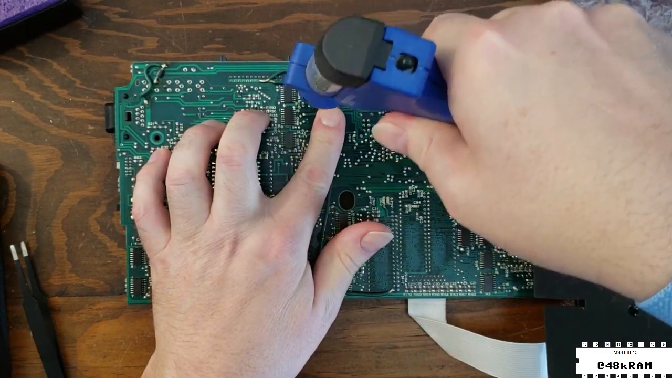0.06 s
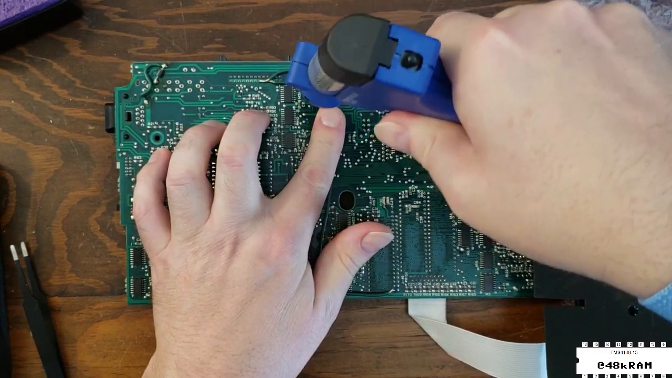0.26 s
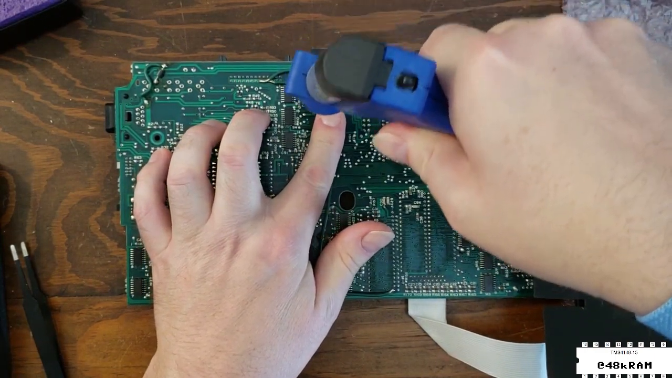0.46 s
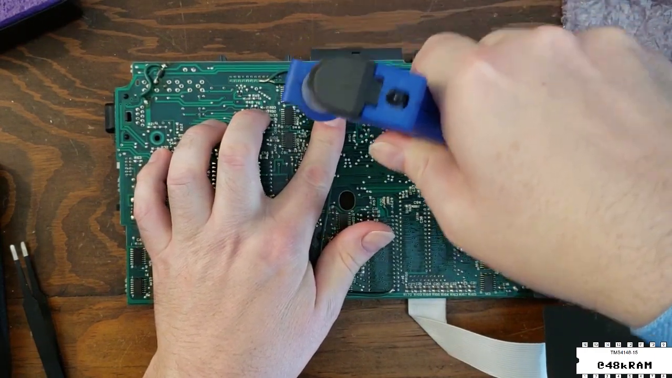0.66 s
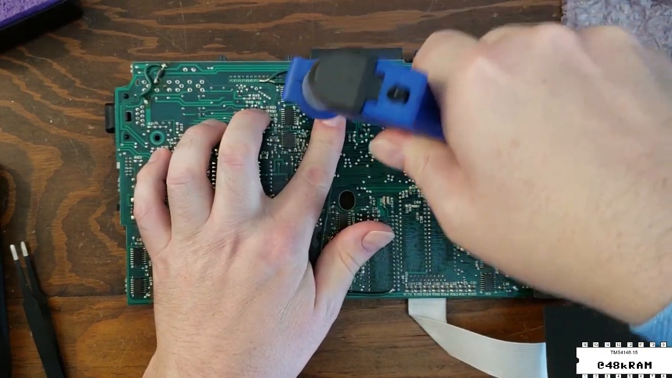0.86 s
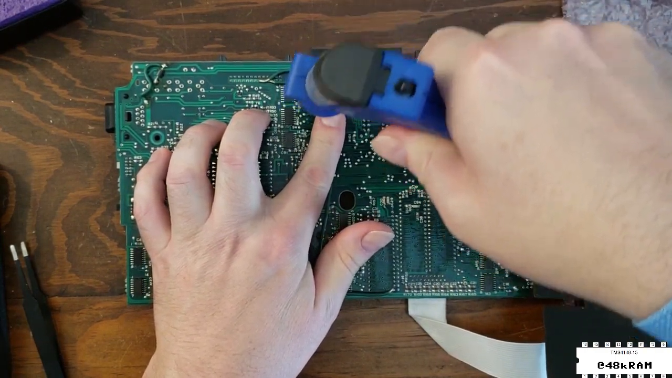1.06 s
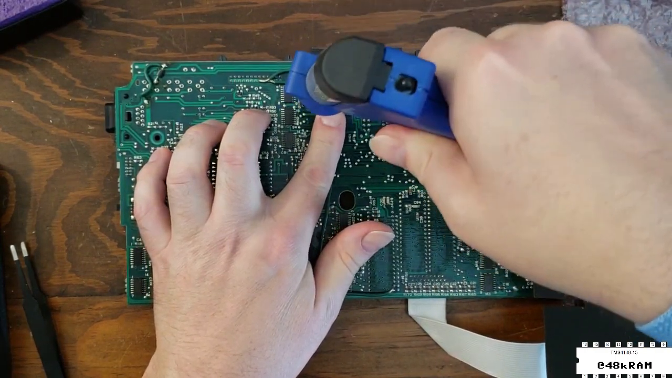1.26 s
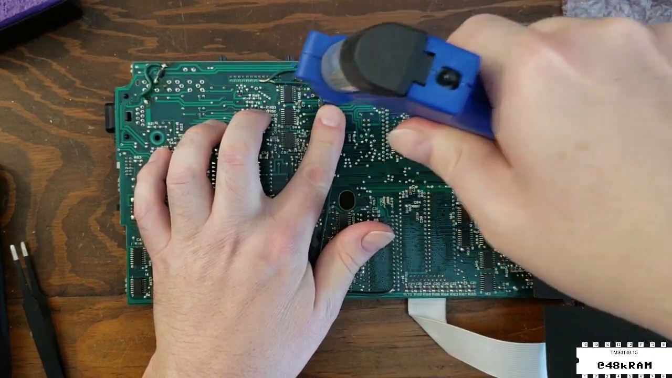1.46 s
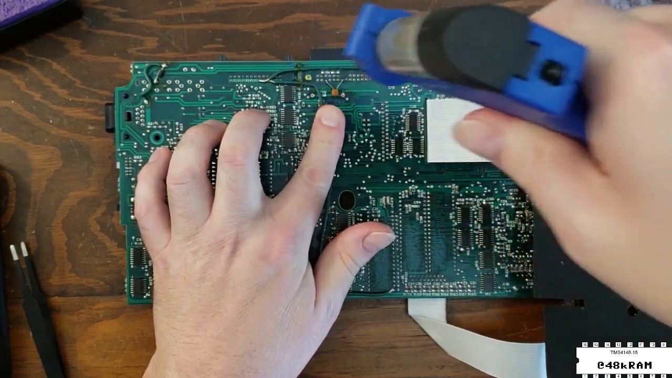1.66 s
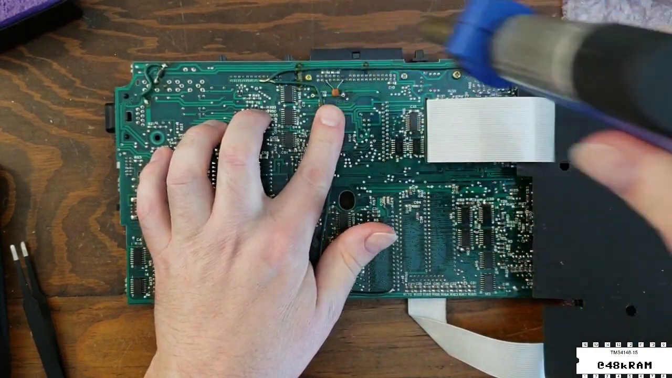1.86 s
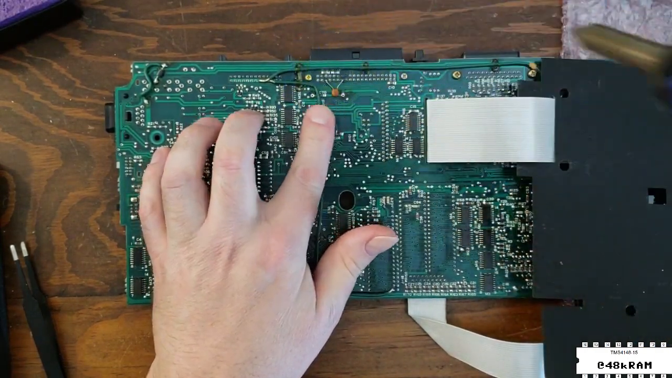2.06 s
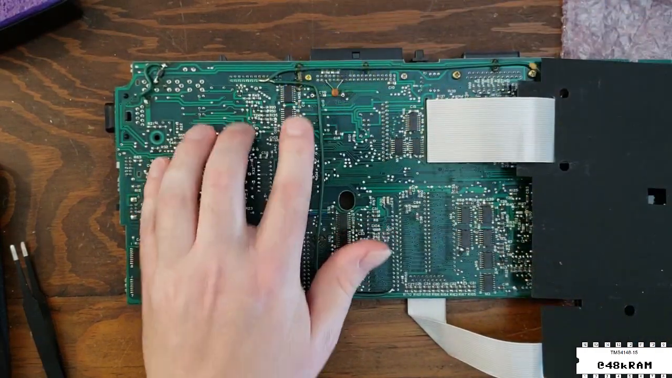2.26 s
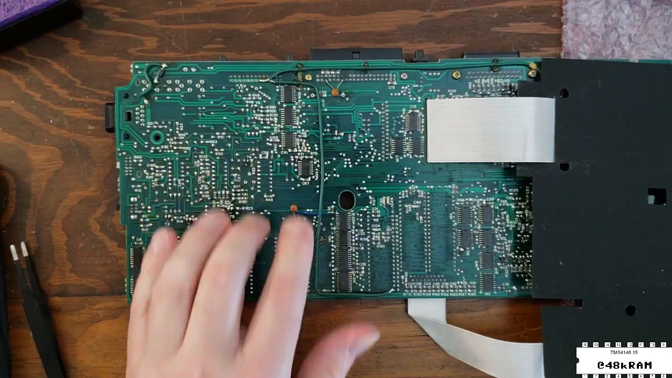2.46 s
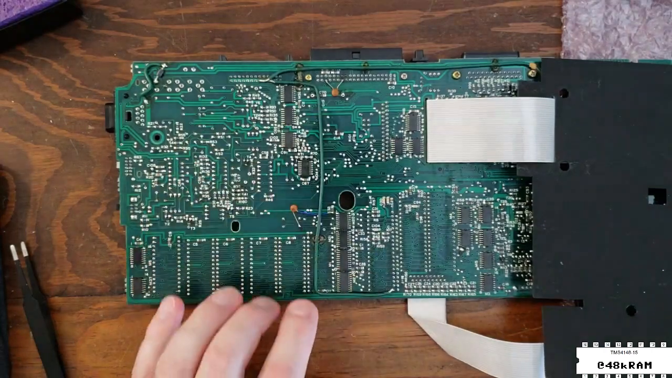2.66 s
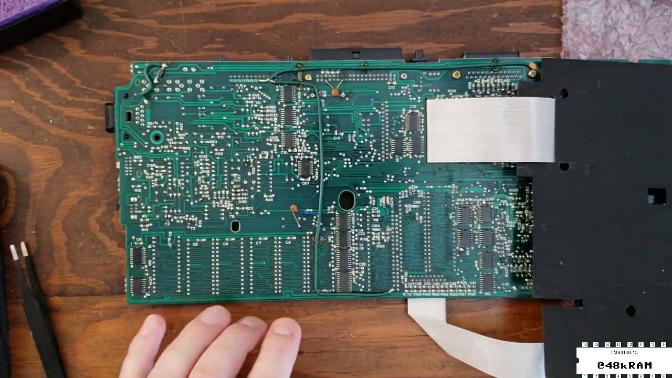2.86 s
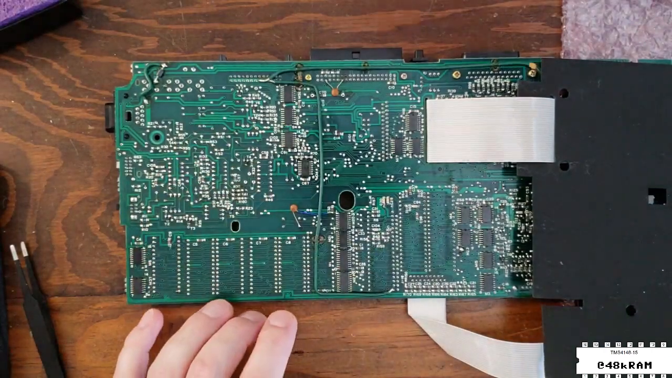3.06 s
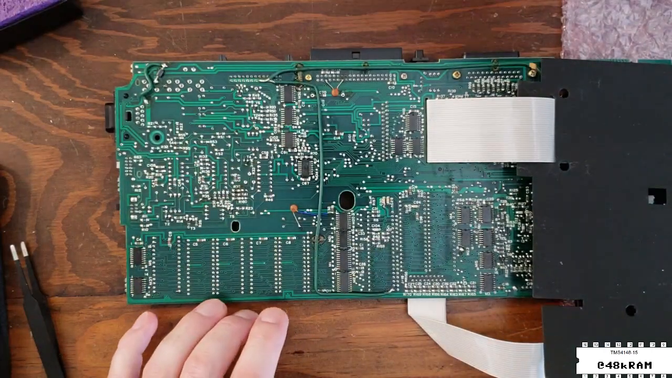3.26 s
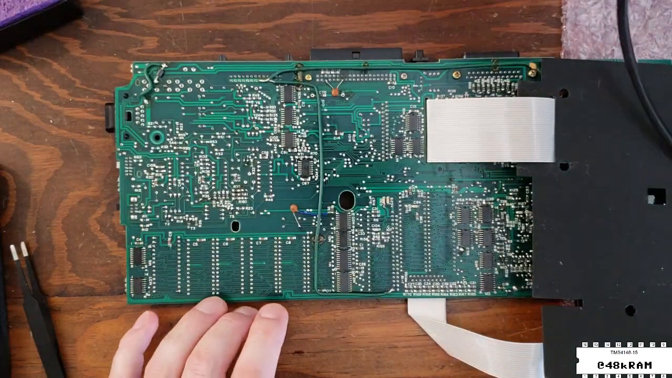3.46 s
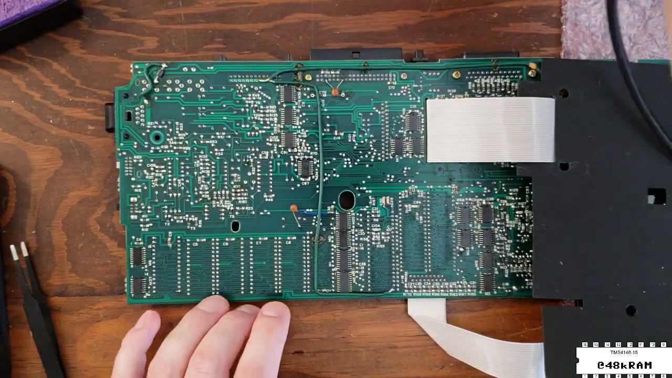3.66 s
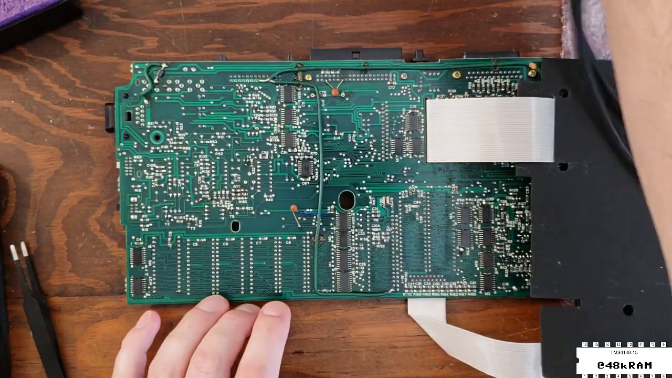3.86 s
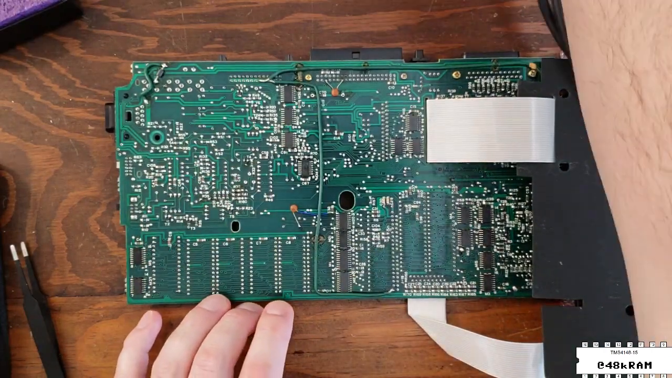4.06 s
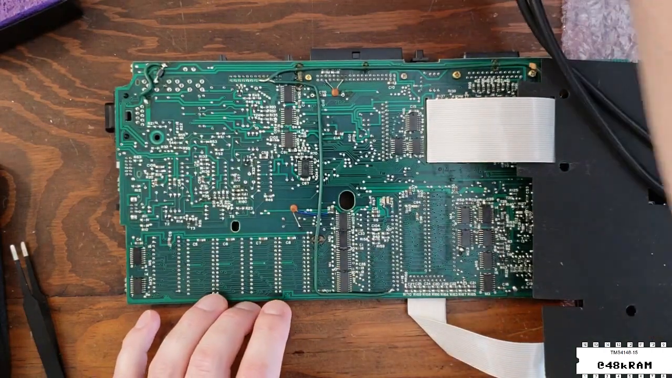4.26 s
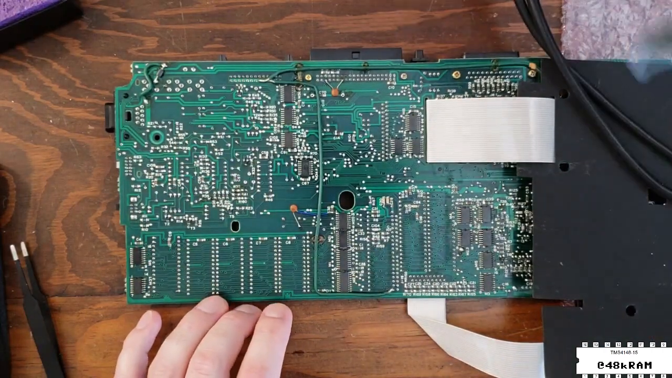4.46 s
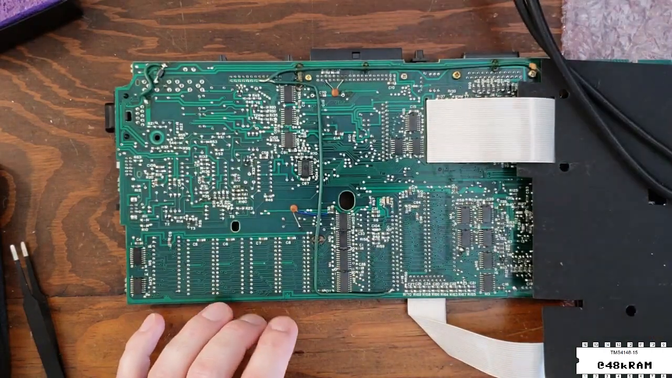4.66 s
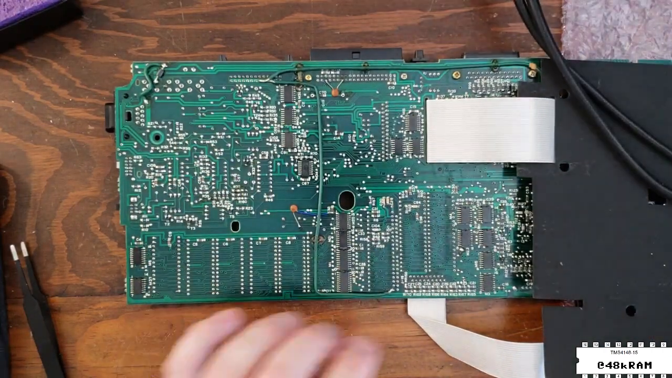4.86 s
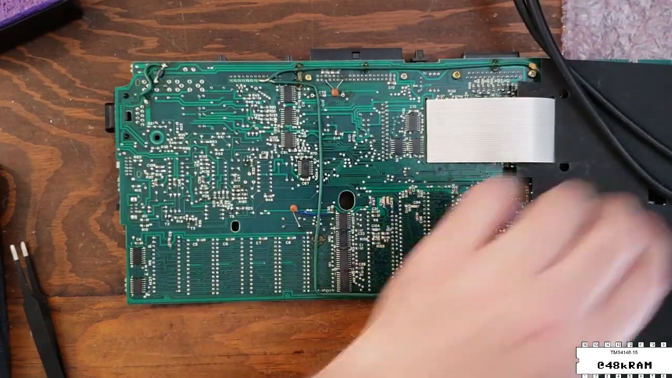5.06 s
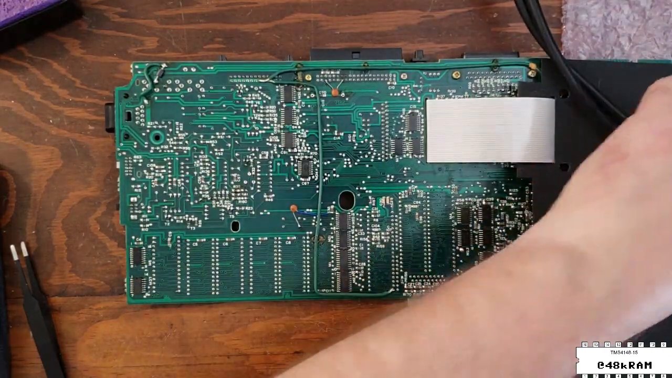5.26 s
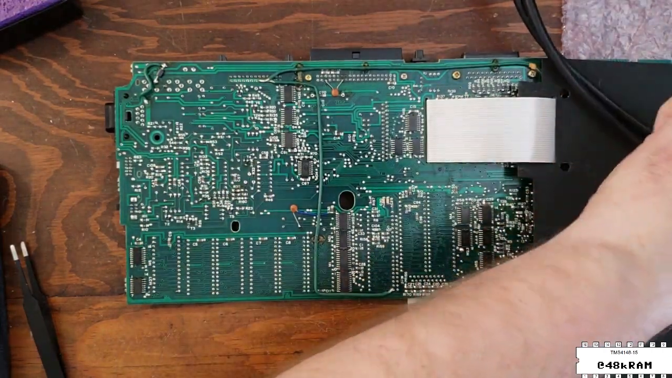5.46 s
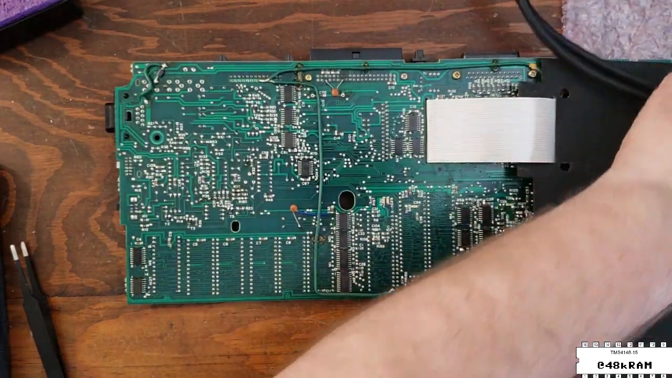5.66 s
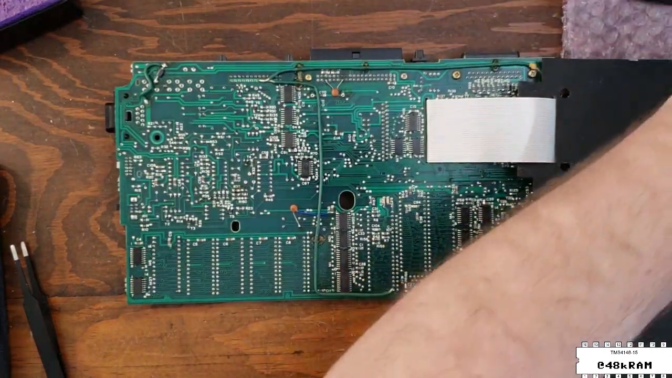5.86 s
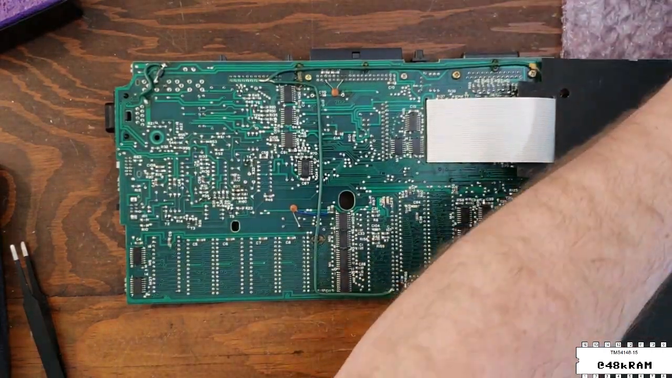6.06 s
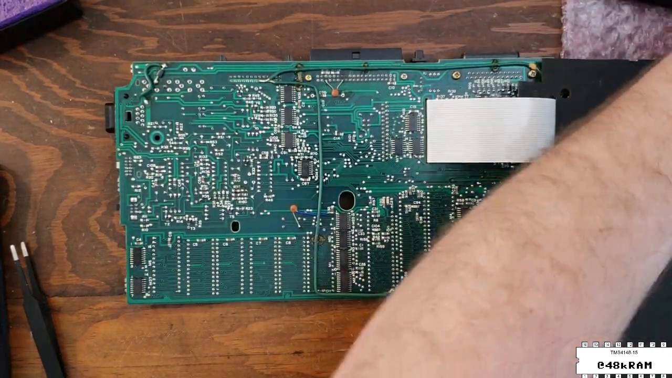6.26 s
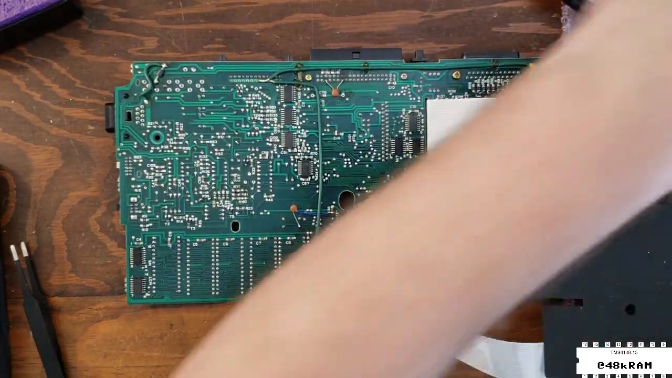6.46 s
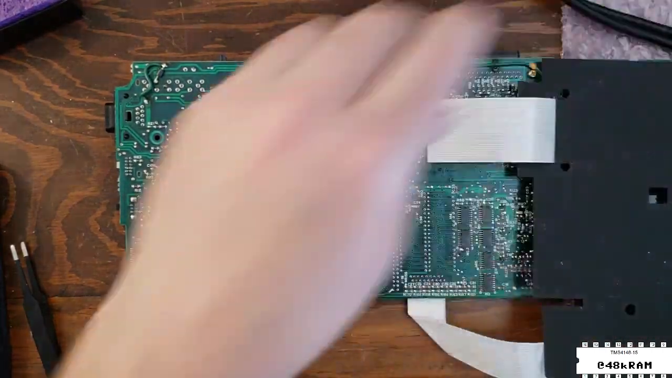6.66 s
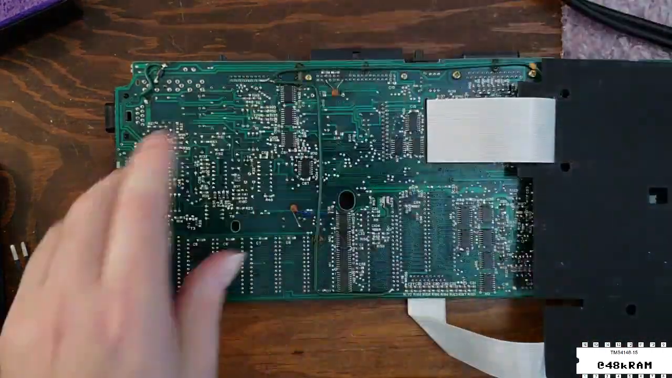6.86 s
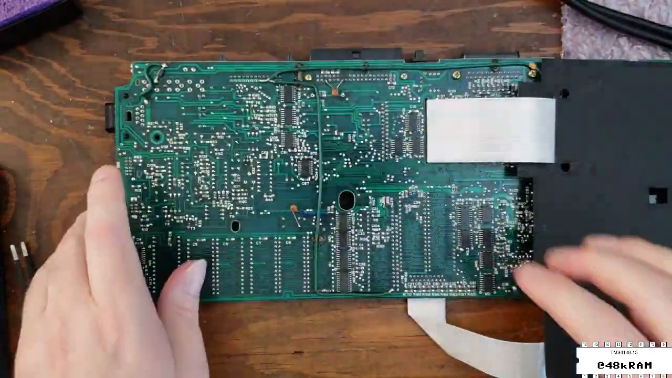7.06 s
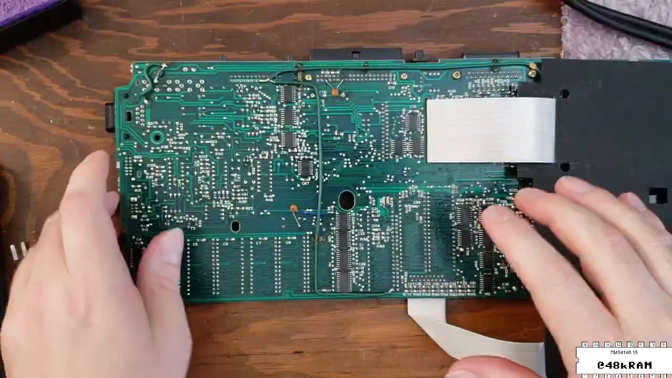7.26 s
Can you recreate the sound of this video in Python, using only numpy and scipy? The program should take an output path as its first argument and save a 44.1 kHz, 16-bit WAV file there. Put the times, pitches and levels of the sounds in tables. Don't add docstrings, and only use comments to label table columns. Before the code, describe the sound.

A rough low motor buzz with bright sucking air runs about a second and a half, gulps briefly, and stops with a switch click and short thump. Faint distant fan and room air remain. A dense, jangling metal clatter follows near four seconds, then sparse handling: wooden taps, dry scuffing and small clicks. Close stereo pickup in a small, dry room.

```python
import sys
import numpy as np
from scipy import signal
from scipy.fft import rfft, irfft, next_fast_len
from scipy.io import wavfile
from scipy.ndimage import uniform_filter1d

SR = 44100
rng = np.random.default_rng(int(sys.argv[2]) if len(sys.argv) > 2 else 0)


def nominal_scale(level):
    x = np.asarray(level, float) / 20
    return 10 ** x


def master_out(mix):
    frames = np.transpose(np.atleast_2d(mix))
    ceiling = np.clip(frames, -1, 1)
    pcm = np.round(ceiling * 32767).astype(np.int16)
    wavfile.write(sys.argv[1], SR, pcm)


N = 322371
TIME = np.arange(N) / SR
HZ = np.fft.rfftfreq(2 * next_fast_len(N // 2 + SR // 4), 1 / SR)
SIZE = 2 * len(HZ) - 2
# frequency in Hz, likeness from 0 to 1.
LIKENESS = [(60, 0.27), (150, 0.24), (380, 0.68), (950, 0.21), (2380, 0.056), (5980, 0.06), (15000, 0.11)]
# frequency in Hz, left minus right in dB.
PUMP_BALANCE = [(60, 3.8), (130, 0.73), (290, 1.4), (640, 3.9), (1410, 4.9), (3100, 6.2), (6820, 12),
                (8800, 2.9), (15000, 5.4)]


def evened(x):
    return x / np.sqrt(np.mean(x ** 2) + 1e-20)


def read(points, hz):
    f, value = np.transpose(points)
    return np.interp(np.log(hz + 1), np.log(f + 1), value)


def colour(x, points):
    return rfft(x, SIZE) * evened(nominal_scale(read(points, HZ)))


def ring(x, modes):
    gain = sum(nominal_scale(db) * width / (width + 1j * (HZ ** 2 - hz ** 2) / hz) for hz, width, db in modes)
    return rfft(x, SIZE) * gain / np.sqrt(np.mean(abs(gain) ** 2))


def swells(rows, time=TIME):
    out = np.zeros((len(rows[0]) - 3, len(time)))
    for peak, rise, fall, *levels_db in rows:
        off = np.maximum((peak - time) / max(rise, .001), (time - peak) / max(fall, .001))
        out += np.outer(nominal_scale(np.array(levels_db)), nominal_scale(-20 * np.minimum(off, 10) ** 1.18))
    return out


def grit(per_s, spread_db, smooth):
    happens = rng.random(N) < per_s / SR
    size = nominal_scale(spread_db * np.minimum(rng.exponential(1, N), 3)) * happens
    return evened((evened(size) + smooth) * rng.standard_normal((3, N)))


def ports(z, balance, apart, wet_db, lag):
    # frequency in Hz, t60 in seconds.
    wall_decay = [(200, 0.14), (1000, 0.17), (4000, 0.22), (12000, 0.15)]
    hz, t, taps = signal.stft(rng.standard_normal((2, SR // 2)), SR, nperseg=256)
    taps = taps * nominal_scale(-60 * t / read(wall_decay, hz)[:, None]) * (t > .004)
    far = signal.istft(taps, SR, nperseg=256)[1][:, :SR // 2]
    same, apart = np.clip(read(LIKENESS, HZ), 0, 1), np.clip(apart, 0, 1)
    late = np.exp(-2j * np.pi * HZ * np.array([[lag], [0]]) / SR)
    own = late * (np.sqrt(1 - apart) * z[0] + np.sqrt(apart) * z[1:])
    heard = np.sqrt(same) * z[0] + np.sqrt(1 - same) * own
    walls = 1 + nominal_scale(wet_db) * rfft(far, SIZE) / np.linalg.norm(far[0])
    return irfft(heard * walls * nominal_scale(np.outer([.5, -.5], read(balance, HZ))), SIZE)[:, :N]


def workshop():
    # frequency in Hz, level in dB per Hz.
    still_air = [(25, -11), (53, -9.5), (110, -16.5), (270, -35), (400, -8.5), (540, -12), (1050, -14.5),
                 (1800, -26.5), (3300, -37.5), (4200, -35), (7600, -32.5), (8500, -40), (13500, -32.5),
                 (16300, -32)]
    # frequency in Hz, left minus right in dB.
    balance = [(60, -3.5), (180, 7), (550, 10.5), (1650, 4), (4970, 8), (15000, 1.5)]
    # frequency in Hz, width in Hz, level in dB.
    fan_modes = [(362.5, 8.6, 5), (424.5, 13, 6), (524, 47, 0.5), (557, 6.3, -4), (750, 13, 0.5),
                 (1060, 4, -0.5), (13900, 27, -25.5)]
    frames, hz = N // 256 + 5, np.fft.rfftfreq(1024, 1 / SR)
    a, b, c, d, patches = rng.standard_normal((frames, 513, 5)).T
    patches = evened(uniform_filter1d(uniform_filter1d(patches, 10, 0), 12, 1))
    same, left = np.clip(read(LIKENESS, hz), -1, 1)[:, None], a + 1j * b
    z = np.array([left, same * left + np.sqrt(1 - same ** 2) * (c + 1j * d)])
    tilt = np.outer([.5, -.5], read(balance, hz))[..., None]
    z *= nominal_scale(read(still_air, hz)[:, None] + 1.8 * patches + tilt)
    air = evened(signal.istft(z, nperseg=1024, noverlap=768)[1][:, :N])
    shared = rng.standard_normal(N + 4)[np.arange(N) + [[0], [4]]]
    whirr = rng.standard_normal((2, N)) + 3.26 * shared
    fan = nominal_scale(-11.5) * irfft(ring(whirr, fan_modes), SIZE)[:, :N]
    return nominal_scale(-62 + 2.5 * np.clip(TIME - 3, 0, 1.96)) * (air + fan)


def static():
    # start in seconds, peak in dB.
    pops = [
        (6.0119, -18),
        (6.0262, -7.5),
    ]
    out, t = np.zeros((2, N)), TIME[:2000]
    jolt = np.exp(-t / 0.00033) * (1 + .5 * np.cos(2 * np.pi * 12500 * t)) / 3.5
    jolt = jolt - 0.5 * np.sin(2 * np.pi * 90 * t) * np.exp(-t / 0.00091) * 2.0
    for s, db in pops:
        out[1, round(s * SR):][:len(t)] += nominal_scale(db) * jolt
    return out


def whistles():
    # start in seconds, stop in seconds, frequency in Hz, width in Hz, level in dB,
    # share of pure tone.
    lines = [
        (1.4, 1.87, 2300, 60, -74, .5),
        (1.7, 6, 3820, 8, -85.5, 2.5),
        (4.2, 6.5, 3900, 220, -77, 0),
        (3.17, 3.56, 2330, 70, -73.5, .2),
        (4.92, 5.3, 2280, 80, -74.5, .2),
    ]
    out = np.zeros((2, N))
    for start, stop, hz, width, db, steady in lines:
        at = slice(int(start * SR), int(stop * SR))
        t, r = TIME[at], np.exp(-np.pi * width / SR)
        slow = signal.lfilter([1 - r], [1, -r], rng.standard_normal((2, 2, 5 * SR)))
        a, b = slow[..., :len(t)]
        in_phase = (evened(a) + steady) * np.std(a) * np.cos(2 * np.pi * hz * t)
        line = in_phase + b * np.sin(2 * np.pi * hz * t)
        out[:, at] += nominal_scale(db) * np.hanning(len(t)) ** 0.34 * evened(line)
    return out


def shudder():
    # peak in seconds, rise in seconds, fall in seconds, level in dB.
    sway = [
        (1.5, .003, 0.27, -39.5),
        (2.03, 0.98, 0.15, -55),
        (2.488, 0.09, 0.043, -58),
        (3.654, 0.084, 0.1, -50.5),
        (3.86, .13, .25, -64),
        (4.16, 0.2, 0.23, -51),
        (4.406, 0.49, 0.2, -50.5),
        (4.82, 0.29, 0.16, -66),
    ]
    wobble = ring(rng.standard_normal(N), [(61.4, 26, -0.45), (89.6, 42, -1.1)])
    return swells(sway)[0] * irfft(wobble, SIZE)[:N]


def pings():
    # start in seconds, peak in dB, frequency in Hz, t60 in seconds.
    struck_notes = [(1.5, -31, 148.4, 0.27), (3.948, -34.5, 886, 0.4), (.022, -27.5, 363, .35),
                    (0.061, -28, 362, 0.22), (0.044, -30.5, 231, 0.35), (3.596, -45, 1050, 0.13),
                    (3.716, -54.5, 1310, 0.03), (3.8043, -38, 2320, 0.13), (3.81, -38, 333.6, 0.3),
                    (3.834, -31.5, 902, 0.12), (3.833, -30.5, 2380, 0.056), (3.849, -32, 203, 0.081),
                    (3.948, -35, 772, 0.31), (3.948, -34, 1083, 0.24), (3.947, -35, 7100, 0.086),
                    (3.833, -50, 6030, 0.34), (3.948, -47, 6100, 0.64), (3.948, -47.5, 3354, 0.6),
                    (4.051, -54, 6140, .8), (4.05, -34, 872, 0.41), (3.226, -53, 1890, 0.027),
                    (3.9645, -28, 2060, 0.055), (3.985, -35, 900, 0.11), (4.05, -40, 5970, 0.062),
                    (4.051, -27.5, 2344, 0.047), (4.058, -23.5, 1270, 0.027), (4.121, -35, 3670, 0.059),
                    (4.123, -36, 6800, 0.13), (4.127, -35, 230, 0.085), (4.143, -27, 260, 0.034),
                    (4.149, -31, 4330, 0.036), (4.157, -28.5, 314, 0.11), (4.18, -29, 212, 0.057),
                    (4.176, -39, 2040, 0.28), (4.2214, -19, 3360, 0.028), (4.2262, -22.5, 355, 0.037),
                    (4.2255, -23, 893, 0.069), (4.235, -20, 474, 0.028), (4.245, -27, 425, 0.15),
                    (4.258, -33, 458, 0.044), (5.438, -37.5, 917, 0.064), (5.506, -38.5, 928, 0.057),
                    (5.722, -42, 1340, 0.055), (5.736, -33.5, 860, 0.034), (5.862, -59, 2400, 0.03),
                    (5.944, -37.5, 584, 0.025), (6.097, -43.5, 770, 0.068), (6.104, -47, 146, 0.23),
                    (6.2, -38, 410, 0.069), (6.215, -40, 307, 0.023), (6.776, -53, 590, 0.047),
                    (6.938, -42.5, 974, 0.088)]
    out, t = np.zeros(N + SR), TIME[:SR // 4]
    for s, db, hz, t60 in struck_notes:
        decay = nominal_scale(db - 60 * t / max(t60, .01))
        out[round(s * SR):][:len(t)] += decay * np.tanh(t / 0.00036) * np.sin(2 * np.pi * hz * t)
    return rfft(out[:N], SIZE)


def scuffs(slip):
    # peak in seconds, rise in seconds, fall in seconds, level in dB, resonance in Hz.
    strokes = [(3.228, .003, 0.17, -63, 1500), (3.232, .006, 0.12, -75, 3000),
               (3.6, .004, 0.075, -58, 2300), (.17, .03, 0.046, -39, 1050), (4.215, .06, .03, -37, 1000),
               (3.856, 0.053, 0.011, -37.5, 900), (3.991, 0.064, 0.011, -40, 900),
               (5.53, 0.035, 0.032, -57, 13000), (5.725, 0.03, 0.045, -68, 7000),
               (6.36, 0.056, .05, -60, 13000), (6.45, 0.092, 0.093, -59, 13100),
               (6.575, 0.25, 0.019, -51, 12900), (6.52, 0.035, 0.097, -68, 3330),
               (6.965, 0.049, 0.025, -44, 3700), (6.99, 0.064, .025, -49, 970),
               (7.21, .04, 0.054, -50.5, 2940)]
    out = np.zeros((3, N))
    for peak, rise, fall, db, hz in strokes:
        at = slice(int(max(peak - .4, 0) * SR), int((peak + .3) * SR))
        hollow = signal.lfilter(*signal.iirpeak(hz, 2.8, SR), slip[:, at])
        out[:, at] += swells([(peak, rise, fall, db)], TIME[at])[0] * evened(hollow)
    return rfft(out, SIZE)


def mottle(x, patchy_db):
    hz, t, z = signal.stft(x, SR, nperseg=256)
    patches = rng.standard_normal(z.shape[1:])
    patches = evened(uniform_filter1d(uniform_filter1d(patches, 6, 0), 7, 1))
    z = z * nominal_scale(patchy_db * patches * (hz[:, None] > 1200))
    return signal.istft(z, SR, nperseg=256)[1][:, :N]


def handling():
    # start in seconds, peak in dB, relative rattle in dB, t60 in seconds, pitch of the struck part in Hz.
    clangs = [(3.596, -36, -8, 0.2, 1000), (3.948, -25, 1, 0.21, 900), (3.964, -21, -12.5, 0.06, 790),
              (3.98, -35, 4, 0.36, 945), (4.049, -30, 10, 0.11, 910), (4.176, -20.5, -6.5, 0.19, 900),
              (4.155, -25, -10, 0.14, 800), (4.205, -21.5, -11, 0.23, 840), (4.189, -24, -14, 0.26, 805),
              (5.438, -41, -2, 0.07, 900), (5.462, -44.5, 10.5, 0.37, 830), (5.506, -43.5, 8, 0.16, 950),
              (6.774, -62, -24, 0.19, 604)]
    bumps = [(3.717, -52, -8, 0.42, 960), (3.805, -39, 10, 0.45, 362), (3.832, -37, 2, 0.092, 960),
             (3.848, -33, -20, 0.068, 328), (3.859, -55, -12, 0.15, 890), (3.9, -40, -20, 0.2, 344),
             (4.1217, -44, 7, 0.33, 1040), (4.226, -23, -16, 0.24, 360), (4.235, -26.5, -25, 0.16, 483),
             (5.738, -41, -28, 0.59, 1010), (5.943, -43.5, -7, 0.16, 610), (6.097, -45, -28, 0.2, 784),
             (6.188, -30.5, 4.5, 0.21, 559), (6.383, -26.5, -14, 0.14, 590)]
    ticks = [(3.5978, -47.5, 5, 0.37, 1850), (3.8043, -34.5, -26, 0.26, 2320),
             (3.9645, -38, 16, 0.17, 2050), (4.058, -29, 3, 0.07, 1250), (4.1211, -40, 8, 0.14, 1050),
             (2.0127, -44.5, -12, 0.2, 2500), (2.156, -61, 10, 0.13, 3600), (2.4426, -64, 12, 0.29, 1590),
             (3.1028, -64, 15, 0.14, 1730), (3.1414, -76, 26, 0.4, 2940), (3.2253, -62, -3, 0.71, 2600),
             (3.535, -72.5, 20, 0.32, 3860), (3.8312, -25, -38, 0.1, 2300), (4.1495, -39, 5, 0.25, 2010),
             (4.2216, -22, 4, 0.069, 1500), (4.3339, -64, 21.5, 0.14, 2010), (4.74, -67, 14, 0.12, 3000),
             (4.58, -62, -7, .3, 2200), (5.5344, -46, -13, 0.22, 1920), (5.7194, -45, 18.5, 0.17, 2320),
             (5.7245, -55, 8, .04, 3000), (5.738, -52, 6, 0.035, 2500), (5.861, -51, 15, 0.033, 3000),
             (6.059, -52, 12, 0.043, 6000), (5.86, -57, 21, 0.64, 2350), (6.2149, -39.5, 8, 0.17, 2140),
             (6.347, -48, -5, 0.13, 4000), (6.4313, -33, -2, 0.058, 2050), (6.4876, -43, -18, 0.13, 3760),
             (7.128, -50.5, -16, 0.63, 3100), (7.178, -52, -7, 0.61, 2820)]
    # peak in seconds, rise in seconds, fall in seconds,
    # hiss in dB, stand ring in dB.
    rubs = [(4.07, 0.08, 0.1, -32.5, -28.5), (4.126, 0.019, 0.052, -30.5, -42),
            (4.19, 0.085, 0.065, -38, -29), (4.227, 0.006, 0.016, -46, -18), (4.27, .02, 0.16, -48, -45),
            (5.445, 0.0087, 0.032, -71, -34), (5.54, 0.11, 0.068, -47.5, -45),
            (5.735, 0.11, 0.088, -45, -42), (5.86, 0.2, 0.26, -53, -60), (6.033, 0.028, 0.18, -59, -63),
            (6.191, 0.0061, 0.07, -32, -83), (6.363, 0.064, 0.032, -35.5, -69),
            (6.44, 0.21, 0.3, -42.5, -72), (6.565, 0.29, 0.029, -47, -68),
            (6.965, 0.074, 0.11, -42.5, -42.5), (7.205, 0.15, 0.19, -53.5, -44)]
    # peak, rise and fall in seconds, rumble in dB.
    drags = [
        (4.14, 0.088, 0.22, -22.5),
        (4.3, .11, 0.62, -58),
        (5.52, 0.099, 0.17, -41),
        (5.947, 0.013, 0.14, -44),
        (6.035, .021, 0.22, -46),
        (6.29, 0.12, 0.19, -74),
        (6.555, 0.92, 0.24, -45),
    ]
    # frequency in Hz, width in Hz, level in dB.
    bench_modes = [(102.7, 7.5, 8), (192, 59, 4.5), (240.8, 6.5, 7.5), (334, 6.8, 13.5), (432, 190, 9.5)]
    stand_modes = [(775, 31, 15), (892, 98, 15.5), (1040, 78, 10), (1360, 480, -2.5), (2010, 180, -2.5),
                   (2320, 69, -23)]
    coil_modes = [(2320, 31, 2), (3700, 31, 14), (5020, 42, 14), (6180, 20, 4), (6240, 31, 8),
                  (6900, 95, 9), (7340, 150, 13)]
    # frequency in Hz, level in dB per Hz.
    rattle_colour = [(760, -1.5), (1300, 1.5), (1750, -4.5), (2050, -2.5), (3060, -8), (3440, -0.5),
                     (4630, -14.5), (5540, -16), (7220, -15.5), (8820, -23), (11000, -20.5), (14800, -21.5),
                     (16300, -42)]
    rub_colour = [(760, -3.5), (1300, -3.5), (1860, -5), (2300, 1), (3670, 0), (4030, 3.5), (4680, -1),
                  (6990, -1.5), (8920, -6), (12200, -2.5), (14500, -5.5), (15500, -12), (16300, -3.5)]
    # frequency in Hz, left minus right in dB.
    balance = [(60, 0.5), (130, 0.33), (290, 2), (640, 2), (1410, 4), (3100, 2.5), (6820, 10.6),
               (8800, 1.3), (15000, 1.3)]
    (hiss, ringing), rumble = swells(rubs), swells(drags)[0]
    blows, struck = np.zeros((4, 3, N + SR)), np.zeros((3, N + SR))
    t = TIME[:SR // 4]
    chatter = np.pad(grit(per_s=1600, spread_db=-6.5, smooth=0.83), ((0, 0), (0, SR)))
    push = np.hanning(44)
    for table, top, thud_db, stand_db, note_db, damping, push_db, contact_db, lead in (
            (clangs, 2, -25, -6, -5, .07, -7, -4, 0),
            (bumps, 2, -3, -8, -6, .07, -9, -2.5, 0),
            (ticks, 3, -12, -14, -5, .25, -30, -1.5, 1.2)):
        for s, db, rattle_db, t60, hz in table:
            at = slice(round(s * SR), round(s * SR) + len(t))
            drive = nominal_scale(db - 3.5 - 60 * (t / max(t60, .01)) ** 0.91) * chatter[:, at]
            drive[:, :3] += nominal_scale(db + contact_db)
            blows[top, :, at] += nominal_scale(rattle_db - 6.0) * drive
            drive[:, :len(push)] += nominal_scale(db + push_db) * push
            blows[:2, :, at] += nominal_scale([thud_db - 4.5, stand_db])[:, None, None] * drive
            note = np.sin(2 * np.pi * hz * t[:1500] + lead)
            note = note * np.exp(-np.pi * (30 + damping * hz) * t[:1500])
            note = note / np.linalg.norm(note)
            struck[:, at] += nominal_scale(note_db) * signal.fftconvolve(drive, note[None], axes=1)[:, :len(t)]
    slip, blows = grit(per_s=1500, spread_db=11.0, smooth=1.8), blows[..., :N]
    bench = ring(blows[0, 0] + nominal_scale(-12.5) * rumble * slip[0], bench_modes)
    thin = HZ ** 2 / (HZ ** 2 + 600 ** 2)
    stand = thin * ring(blows[1] + nominal_scale(-2) * ringing * slip, stand_modes)
    stand = stand + np.sqrt(thin) * rfft(struck[:, :N], SIZE)
    early = abs(TIME - 4.1) < .35
    loose = colour(blows[2], rattle_colour) + nominal_scale(-8.5) * ring(blows[2] * early, coil_modes)
    loose = loose + nominal_scale(-4.0) * colour(hiss * slip + blows[3], rub_colour)
    mix = bench + stand + loose + pings() + scuffs(slip)
    return mottle(ports(mix, balance, apart=0.97, wet_db=-10.0, lag=5.1), patchy_db=2.0)


def shaft():
    after = np.maximum(TIME - 1.492, 0)
    speed = 88.15 - 32.7 * np.exp(-(TIME / .07) ** 1.35) - 5.5 * np.exp(-TIME / .3)
    speed = 30 + (speed - 30) * np.exp(-after / .09)
    return speed, np.minimum(TIME / 0.085, 1) ** 0.8 * nominal_scale(-np.minimum(280 * after, 200))


def mount(hz):
    # frequency in Hz, width in Hz, level in dB.
    modes = [(146.8, 22.7, -9), (164, 27, -29), (232.6, 13, -21), (266.3, 16, -16), (341.3, 22.4, -11)]
    # frequency in Hz, width in Hz, depth from 0 to 1.
    notches = [(247, 16, .8), (331, 14, .62)]
    notch = np.prod([1 - depth / (1 + (2 * (hz - f) / width) ** 2) for f, width, depth in notches], axis=0)
    return notch * abs(sum(nominal_scale(db) * width / (width + 1j * (hz ** 2 - f ** 2) / f) for f, width, db in modes))


def shaft_orders(speed, push, turns, suction):
    # multiple of the shaft rate, level in dB.
    shaft_lines = [(1, -22), (2, -7), (3, -3), (4, 0), (5, -25), (6, -25), (7, -27), (8, -32), (9, -21),
                   (10, -27), (11, -24), (12, -32), (13, -29), (14, -29), (15, -20.5), (16, -32),
                   (17, -19.5), (20, -20), (21, -32), (22, -25), (23, -31), (24, -33), (26, -30), (27, -33),
                   (28, -33), (31, -33), (32, -31), (36, -33), (37, -32)]
    brush_lines = [(46.8, -40), (59.4, -34.5), (71, -36), (65, -43.5), (76.4, -42)]
    push_db = [-6.5, -6, -6.5]
    low = {2 + k: push * nominal_scale(db) * mount((2 + k) * speed) for k, db in enumerate(push_db)}
    low[1] = np.sqrt(push) * nominal_scale(-39.5) + swells([(.16, .16, .12, -35.5)])[0]
    tones, end = np.zeros((2, N)), int(2 * SR)
    steady = nominal_scale(-6.5) * (speed / speed.max()) ** 12
    steady = steady * nominal_scale(-3.5 * (1 - np.clip((TIME - 0.41) / 0.13, 0, 1)))
    fifth = push * np.sqrt(2) * nominal_scale(-31.5 - 10 * np.clip((TIME - 0.367) / .06, 0, 1))
    tones += fifth * np.cos(10 * np.pi * turns)
    orders = shaft_lines + brush_lines
    for (k, db), (start, apart) in zip(orders, rng.random((len(orders), 2))):
        level = low.get(k, suction * steady * nominal_scale(db + 17.5))
        waver = evened(np.interp(TIME[:end], np.arange(21) / 10, rng.standard_normal(21)))
        level = level[:end] * (1 + min(0.014 * k * (k > 4) + 0.018, .22) * waver)
        gap = -abs((apart - .5) * 0.86 * (1 - np.clip(read(LIKENESS, 88 * k), 0, 1)))
        if k < 5:
            gap = -.075 * (k != 2)
            start = -0.2067 * k * k + .08 + .27 * (k == 1)
        lean = nominal_scale(np.outer([.5, -.5], read(PUMP_BALANCE, 88 * k))) / np.cos(np.pi * gap)
        phase = k * turns[:end] + start + np.array([[0], [gap]])
        tones[:, :end] += lean * level * np.sqrt(2) * np.cos(2 * np.pi * phase)
    return tones


def pump_air(speed, turns, suction):
    # frequency in Hz, level in dB per Hz.
    air_colour = [(40, -48), (124, -32), (170, -22), (300, -17.5), (350, -14), (430, -29), (650, -40),
                  (900, -19.5), (1500, -23), (2900, -25.5), (4000, -22.5), (5300, -30), (6800, -34),
                  (15000, -26.5)]
    # frequency in Hz, width in Hz, level in dB.
    shell_modes = [(231, 10, -20), (453, 170, -6), (775, 16, 10), (900, 17, -0.5), (1170, 80, -8),
                   (1970, 370, -30), (2300, 116, -3.5)]
    nozzle_modes = [(6300, 220, -6), (6840, 1030, 6)]
    snap_modes = [(9700, 800, -2), (12000, 1500, -4), (15000, 1800, 0)]
    # peak in seconds, rise in seconds,
    # fall in seconds, level in dB over the steady hiss.
    gulps = [
        (.08, 0.064, 0.037, 2.5),
        (.26, 0.073, 0.15, -21.5),
        (.378, 0.031, 0.044, -5),
        (.68, 0.66, 1, -9),
        (1.116, 0.028, 0.013, 5),
        (1.24, 0.073, 0.057, -1.5),
        (1.42, 0.17, 0.4, -3),
        (1.485, .004, 0.0069, -5),
    ]
    puff = 1 + 0.2 * np.cos(2 * np.pi * turns) + 0.12 * np.cos(4 * np.pi * turns + 0.21)
    drive = puff * suction * grit(per_s=5600, spread_db=2.0, smooth=1.77)
    bright = 1 / (1 + (3200 / (HZ + 1)) ** 4)
    rush = nominal_scale(-2.5) * np.clip((TIME - 0.019) / 0.02, .4, 1)
    rush = rush * nominal_scale(70 * np.clip(TIME - 1.54, 0, .2)) * (1 + swells(gulps)[0])
    jet = colour(drive * rush, air_colour) + nominal_scale(-7.5) * ring(drive * rush, nozzle_modes)
    flow = (1 - bright) * colour(drive, air_colour) + bright * jet
    since = np.maximum(TIME - 1.4838, 0)
    snap = nominal_scale(-16) * (since > 0) * np.exp(-since / 0.002) * np.sign(drive)
    flow = flow + ring(snap, snap_modes)
    slap = nominal_scale(15.0) * (1 - speed / speed.max()) ** 0.47 * np.exp(-((turns + .55) % 1) / 0.31)
    slap = slap * suction * np.sign(drive) * (TIME > .025)
    shell = ring(drive * np.clip(TIME / 0.16, .4, 1), shell_modes)
    air = nominal_scale(-2) * ring(slap, [(1150, 1200, -0.5), (1810, 270, 5.5)])
    air = air + nominal_scale(-3.0) * flow + nominal_scale(-7.0) * shell
    kick = nominal_scale(-29.5 - 169.5 * np.clip(TIME - 1.492, 0, 1)) * (TIME > 1.492) * rng.standard_normal(N)
    air = air + ring(kick, [(252, 97, 0), (335, 47, 6.0), (410, 44, -5)])
    return ports(air, PUMP_BALANCE, apart=.75, wet_db=-6, lag=-4)


def pump():
    # time in seconds, level in dB.
    flow_db = [(0, -35), (.03, -30.5), (.1, -27.5), (.39, -29), (.44, -31.5), (1.48, -33), (1.524, -33.5),
               (1.6, -52), (1.68, -72)]
    speed, push = shaft()
    turns = np.cumsum(speed) / SR
    suction = nominal_scale(np.interp(TIME, *np.transpose(flow_db), right=-200))
    return shaft_orders(speed, push, turns, suction) + pump_air(speed, turns, suction)


def scene():
    return workshop() + static() + whistles() + shudder() + handling() + pump()


def top_cut(x):
    return signal.sosfilt(signal.butter(12, 17030, fs=SR, output="sos"), x)


def record(dry):
    # frequency in Hz, gain in dB.
    response = [(7700, -1.5), (8050, -8), (8500, -9), (8900, -8.5), (10000, -6), (11200, -2.5),
                (15900, 1.5), (16100, -53.5)]
    cut = signal.sosfilt(signal.butter(5, 50, "high", fs=SR, output="sos"), dry)
    shaped = irfft(rfft(cut, SIZE) * nominal_scale(read(response, HZ)), SIZE)[:, :N]
    return top_cut(shaped)


dry = scene()
out = record(dry)
master_out(out)
```